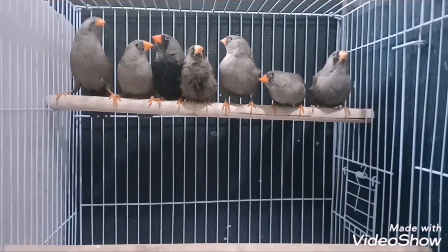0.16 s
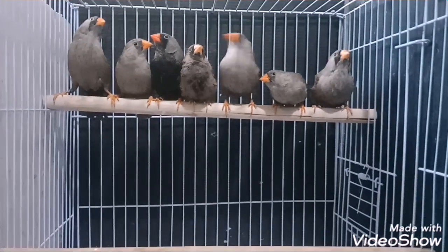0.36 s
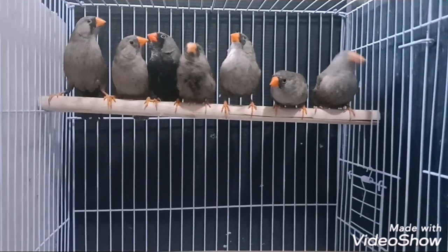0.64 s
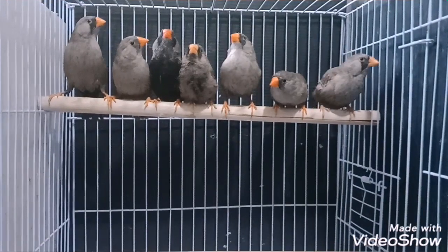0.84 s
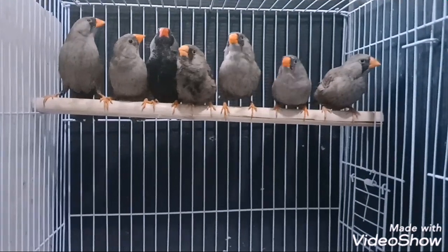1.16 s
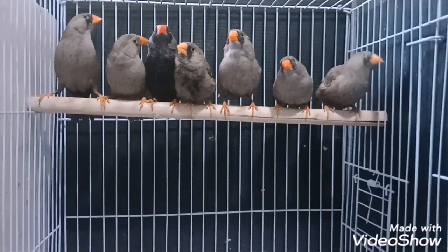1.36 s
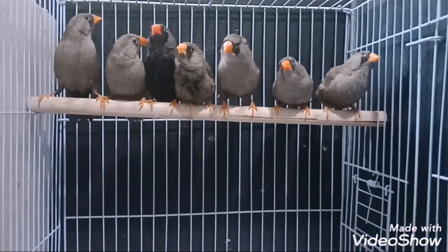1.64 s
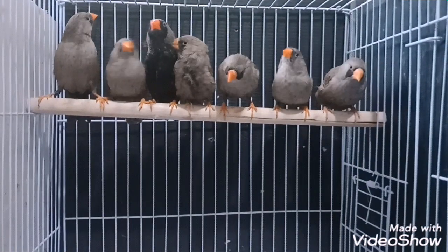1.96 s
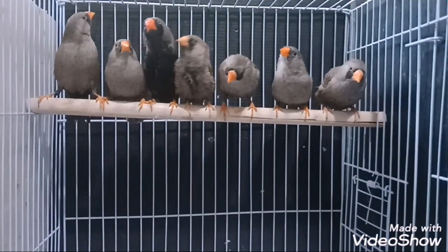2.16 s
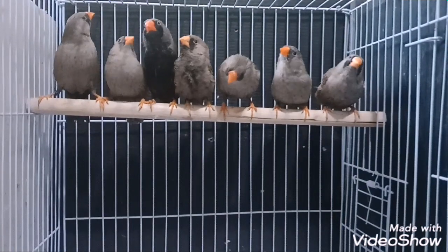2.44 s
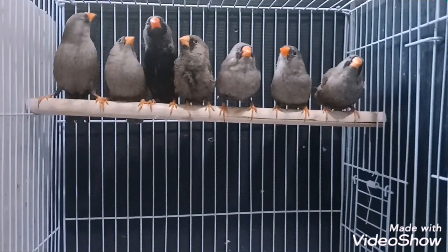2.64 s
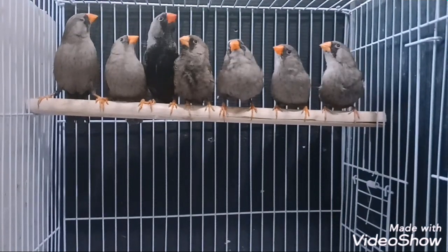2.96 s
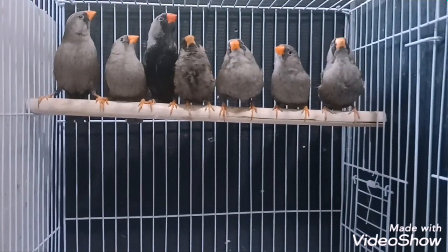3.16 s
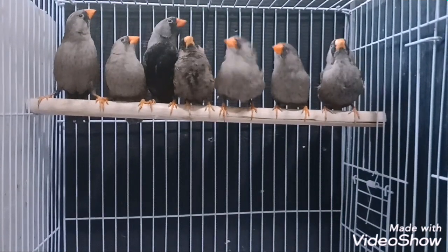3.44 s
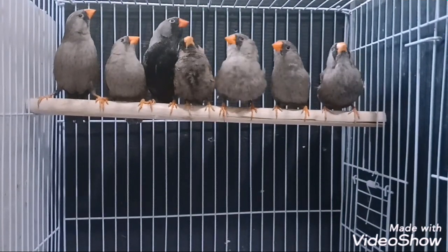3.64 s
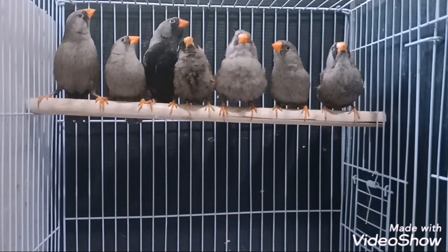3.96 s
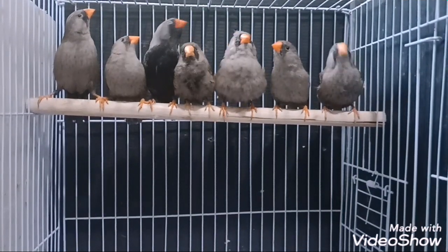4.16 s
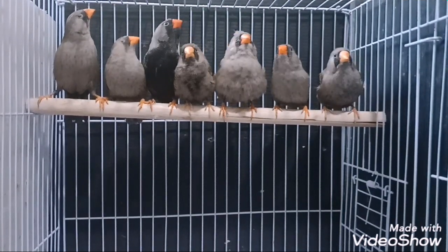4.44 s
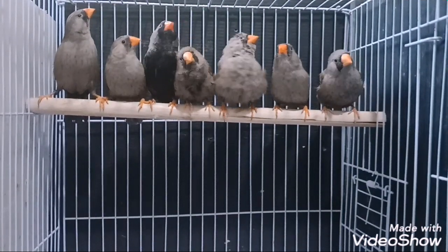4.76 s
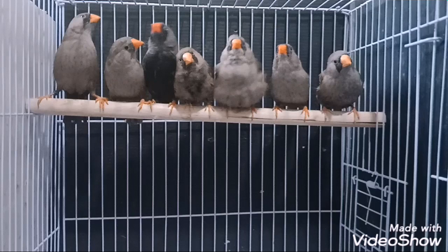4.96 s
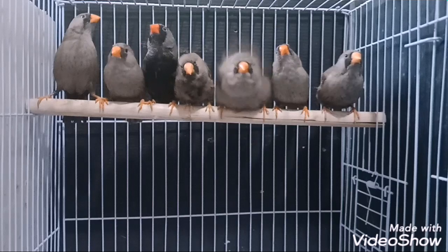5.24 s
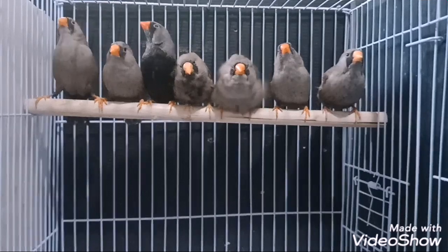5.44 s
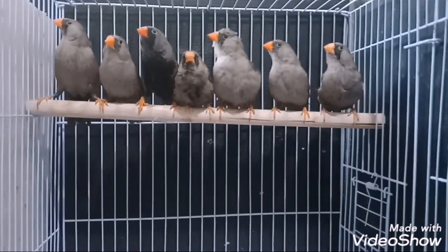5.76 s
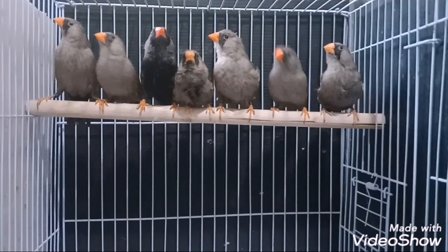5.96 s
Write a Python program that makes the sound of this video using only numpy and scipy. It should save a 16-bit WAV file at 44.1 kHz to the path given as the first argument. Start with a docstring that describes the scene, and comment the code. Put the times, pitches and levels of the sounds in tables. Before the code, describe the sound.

Small caged finches chatter nonstop indoors, hoarse nasal beeps and short fluttering whistles overlapping a farther flock, with a few hollow knocks.

```python
"""Small finches in a hard-walled room, over the murmur of a farther flock and a low rumble that comes and goes.
Hoarse calls close by open it (ragged harmonic stacks with hiss); short whistles (fluttering tones) soon join.
One clear arched call stands out, with a few short clear calls near it and two more near the end.
Something hollow is knocked twice midway and twice near the end: ringing partials over a dull thud.
A two-port microphone takes it all in; its left port is shaded and hears birds and knocks a little later."""
import sys
import numpy as np
from scipy import signal
from scipy.fft import rfft, irfft, next_fast_len
from scipy.io import wavfile
from scipy.ndimage import uniform_filter1d, minimum_filter1d, map_coordinates

SR = 44100
rng = np.random.default_rng(int(sys.argv[2]) if len(sys.argv) > 2 else 0)


def pcm_store(signal):
    """Save signal as 16-bit PCM."""
    levels = np.round(np.clip(np.atleast_2d(signal), -1, 1) * 32767)
    wavfile.write(sys.argv[1], SR, levels.astype(np.int16).T)


def magnitude_from_level(level_db):
    """Linear magnitude for a level in decibels (20 dB per decade)."""
    exponent = np.asarray(level_db, float) / 20
    return 10 ** exponent


N = 269010

# throat of the arched call and of the flock: hz, gain_db
ARCH_AND_FLOCK_THROAT = [(400, -51.5), (1000, -11), (1700, -11.5), (2500, -3.5), (3500, 0.5), (4500, -8.5),
                         (5500, -16), (7000, -31.5), (8500, -95.5)]


def unit(x):
    """Scale to rms 1."""
    return x / np.sqrt(np.mean(x ** 2) + 1e-20)


def along(points, hz):
    """Read (hz, value) points on a logarithmic frequency axis."""
    f, v = np.transpose(points)
    return np.interp(np.log(hz + 1), np.log(f + 1), v)


def curves(rows):
    """One value per sample for each column after the time."""
    s, *cols = np.transpose(rows)
    return [np.interp(np.arange(N) / SR, s, c) for c in cols]


def wobble(n, rate):
    """A smooth random curve, rate knots a second."""
    knots = rng.standard_normal(int(n * rate / SR) + 4)
    return map_coordinates(knots, [np.arange(n) * rate / SR])


def filtered(x, response):
    """Multiply the spectrum of x by a response of frequency in Hz."""
    m = next_fast_len(N + 8192)
    return irfft(rfft(x, m) * response(np.fft.rfftfreq(m, 1 / SR)), m)[..., :N]


def add(out, s, sound, pan_db):
    """Place a sound at s seconds; pan_db is left over right, and the port it favours hears it earlier."""
    lag_per_db = 2.5  # samples between the ports
    for port, sign in zip(out, (1, -1)):
        start = max(round(s * SR - sign * lag_per_db * pan_db / 2), 0)
        part = port[start:][:len(sound)]
        part += magnitude_from_level(sign * pan_db / 2) * sound[:len(part)]


def swell(n, rise):
    """Breath of one call: a rise and fall; the smaller rise, the earlier the peak."""
    return np.sin(np.pi * np.linspace(0, 1, n) ** rise)


def surges(rows, rise_db_per_s, fall_db_per_s, rest_db):
    """Amplitude of swells that climb, hold and sink at steady dB rates above a resting level."""
    t = np.arange(N) / SR
    power = magnitude_from_level(rest_db) ** 2
    for s, held, db, *_ in rows:
        below_db = np.maximum(0, np.maximum(rise_db_per_s * (s - t), fall_db_per_s * (t - s - held)))
        power = power + magnitude_from_level(db - below_db) ** 2
    return np.sqrt(power)


def voice(pitch_hz, throat, jitter, shimmer_db, breathy=0):
    """The syrinx: harmonics of unsteady cycles, each waxing and waning alone, smeared by turbulent breath."""
    n, k = len(pitch_hz), np.arange(1, 15)[:, None]
    phase = 2 * np.pi * np.cumsum(pitch_hz * (1 + jitter * wobble(n, 505.7))) / SR
    waver = magnitude_from_level(shimmer_db * wobble(n * len(k), 89.9).reshape(len(k), n))
    breath = wobble(n * len(k), 800).reshape(len(k), n)
    waver = waver * (1 - breathy + breathy * breath)
    stack = waver * throat(k * pitch_hz) * np.sin(k * phase + rng.uniform(0, 2 * np.pi, k.shape))
    return unit(stack.sum(0) * magnitude_from_level(shimmer_db / 2 * wobble(n, 302.6)))


def rasps():
    """Hoarse calls close by: ragged cycles on a rising and sagging pitch, and a hiss on top."""
    # the calls: start_s, length_s (before the breath stretches it), level_db, hiss_over_call_db (before its filter)
    calls = [(0.008, 0.13, -19, -11), (0.221, 0.07, -22, -11.5), (0.437, 0.11, -20, -6.5),
             (0.759, 0.036, -18.5, -42), (1.341, 0.05, -27, -16), (1.448, 0.072, -20.5, -24),
             (1.588, 0.069, -22.5, -14), (1.97, 0.12, -25, -15.5), (2.098, 0.079, -17.5, -15),
             (2.197, 0.07, -24, -19), (2.416, 0.096, -25.5, -30), (2.556, 0.079, -18, -25),
             (2.676, 0.077, -19, -22), (2.844, 0.11, -17, -20.5), (3.285, 0.03, -29, -35),
             (3.383, 0.098, -18.5, -18.5), (4, 0.037, -25, -29), (4.224, 0.05, -27.5, -44),
             (4.273, 0.066, -22.5, -17), (4.317, 0.086, -18.5, -16), (4.466, 0.092, -20, -22.5),
             (4.75, 0.115, -15, -14.5), (5.306, 0.064, -18, -20.5), (5.493, 0.04, -24.5, -28),
             (5.643, 0.064, -25, -44), (5.714, 0.051, -18.5, -22)]
    # throat of a hoarse call: hz, gain_db
    hoarse_throat = [(400, -29.5), (1200, -35), (2000, -9), (3200, -6.5), (4500, -4.5), (5600, -1.5),
                     (6500, -10.5), (7400, -32.5), (9000, -31), (11000, -75.5)]
    # colour of the hiss: hz, gain_db
    hiss_colour = [(6500, -87), (8000, -4), (10000, -9), (11500, -18), (14500, 0.5), (15400, -82.5)]
    stretch, lead_s = 1.4, .005  # breath length over call length; it starts early
    out, air = np.zeros((2, N)), np.zeros((2, N))
    for (s, length, db, hiss_db), (high, side) in zip(calls, rng.random((len(calls), 2))):
        n = int(stretch * length * SR)
        pitch = (560 + 300 * high) * (1 + .14 * np.sin(np.linspace(.5, 3.8, n)))
        sink = np.linspace(.98, 1.14, n)  # the throat resonances are divided by this during the call
        throat = lambda f: magnitude_from_level(along(hoarse_throat, f * sink))
        call = voice(pitch, throat, jitter=.025, shimmer_db=2, breathy=.65)
        call = magnitude_from_level(db + 0.41 * wobble(n, 91.0)) * swell(n, rise=.62) * call
        add(out, s - lead_s, call, 8 * (side - .5))
        hiss = magnitude_from_level(db + hiss_db + 4 * wobble(n, 120)) * swell(n, rise=0.7) * rng.standard_normal(n)
        add(air, s - lead_s, hiss, 0)
    return out + filtered(air, lambda f: magnitude_from_level(along(hiss_colour, f)))


def notes():
    """Whistles: the throat passes one harmonic, fluttering; long high peeps add the syrinx's second side."""
    # the whistles: start_s, length_s, pitch_hz (they glide and flutter about it), level_db
    whistles = [(0.507, 0.03, 3530, -14), (0.598, 0.17, 2945, -19.5), (0.65, 0.12, 3446, -23.5),
                (0.774, 0.051, 3420, -19), (1.185, 0.023, 3150, -24), (1.242, 0.065, 4230, -24),
                (1.24, 0.053, 2130, -28.5), (1.478, 0.036, 2980, -19.5), (1.714, 0.032, 2560, -21.5),
                (1.864, 0.027, 3680, -17), (1.894, 0.019, 3680, -17.5), (1.936, 0.047, 4060, -19),
                (1.948, 0.051, 4326, -14), (1.954, 0.093, 2630, -20.5), (1.969, 0.1, 4550, -14),
                (2.088, 0.018, 3235, -19.5), (2.131, 0.033, 2555, -17.5), (2.278, 0.022, 4300, -20),
                (2.319, 0.013, 4420, -13), (2.468, 0.11, 3250, -18.5), (2.848, 0.062, 4250, -17),
                (2.855, 0.073, 3115, -17.5), (2.408, 0.058, 2590, -20.5), (3.078, 0.11, 3446, -21.5),
                (3.109, 0.037, 4030, -14.5), (3.149, 0.058, 2760, -16), (3.3, 0.037, 3940, -24.5),
                (3.51, 0.087, 3500, -22), (3.554, 0.1, 2936, -20.5), (3.585, 0.11, 3486, -17.5),
                (3.646, 0.11, 2970, -14.5), (3.699, 0.098, 4310, -12), (3.769, 0.052, 3620, -22),
                (3.808, 0.18, 2743, -20), (4.031, 0.046, 3650, -18), (4.109, 0.022, 3620, -19),
                (4.168, 0.03, 2580, -15), (4.212, 0.042, 2690, -15.5), (4.324, 0.068, 3270, -11.5),
                (4.383, 0.04, 3560, -17.5), (4.395, 0.086, 2810, -20), (4.448, 0.012, 3490, -12),
                (4.517, 0.101, 3676, -16.5), (4.7, 0.033, 3205, -10), (4.723, 0.083, 2623, -16),
                (4.852, 0.047, 2775, -16.5), (4.994, 0.137, 3514, -19.5), (5.035, 0.11, 2886, -21),
                (5.197, 0.057, 3900, -26), (5.357, 0.088, 2420, -19), (5.727, 0.032, 3370, -11.5),
                (5.783, 0.093, 2650, -23), (5.845, 0.07, 3485, -15), (5.908, 0.037, 3590, -7),
                (5.924, 0.08, 3130, -13), (6.058, 0.03, 3570, -21)]
    glide, sag = .015, .05  # shares of the pitch: drift either way, and a fall that grows with pitch
    octave_db = -31
    out = np.zeros((2, N))
    for (s, length, hz, db), (slide, side) in zip(whistles, rng.uniform(-0.93, 1, (len(whistles), 2))):
        n = int(length * SR)
        unsteady = min(1, length / .07)  # long notes flutter most
        drift = glide * slide * np.linspace(-1, 1, n)
        fall = sag * (hz / 3500) ** 3 * (np.linspace(0, 1, n) ** 2 - .3)
        pitch = hz * (1 + drift - fall) * (1 + .022 * unsteady * wobble(n, 260))
        phase = 2 * np.pi * np.cumsum(pitch) / SR
        tone = np.sin(phase) + magnitude_from_level(octave_db) * np.sin(2 * phase)
        tone = tone * magnitude_from_level(3.5 * unsteady * wobble(n, 160))
        if hz > 4200 and length > .06:
            tone = tone + magnitude_from_level(4 * wobble(n, 160) - 7) * np.sin(1.08 * phase)
        add(out, s, magnitude_from_level(db) * swell(n, rise=0.5) ** 1.5 * tone, 4 * side - 1)
    return out


def clear_calls():
    """Calls with clean harmonic lines: steady cycles of the syrinx, one long arch and some short ones."""
    # course of the arched call: time_s, pitch_hz, level_db
    arch_course = [(.842, 660, -29.5), (0.858, 763, -13), (0.873, 837, -12.5), (0.892, 723.5, -13),
                   (.9, 688, -14), (0.909, 629, -13.5), (.93, 616, -18.5), (0.961, 585, -25)]
    # short calls: start_s, length_s, pitch_hz, level_db, throat_hz
    short_calls = [(.52, .06, 480, -33, 1900), (.73, .04, 860, -30, 2600), (.972, .05, 780, -21, 4250),
                   (5.36, .06, 600, -30, 2400), (5.5, .07, 515, -28, 2060)]
    out = np.zeros((2, N))
    start_s, end_s = arch_course[0][0], arch_course[-1][0]
    span = slice(int(start_s * SR), int(end_s * SR))
    pitch, db = [c[span] for c in curves(arch_course)]

    def arch_throat(f):
        return magnitude_from_level(along(ARCH_AND_FLOCK_THROAT, f)) / (1 + (f / 4600) ** 14) / (1 + (1900 / f) ** 4)

    arch = voice(uniform_filter1d(pitch, size=300), arch_throat, jitter=.003, shimmer_db=2)
    add(out, start_s, magnitude_from_level(db) * arch, 0.)
    for s, length, hz, db, throat_hz in short_calls:
        n = int(length * SR)

        def throat(f):
            resonance = 1 / (1 + ((f - throat_hz) / (.24 * throat_hz)) ** 4)
            return 0.2 * (f < throat_hz) * 2000 / throat_hz + resonance

        call = voice(hz * np.linspace(1.02, .96, n), throat, jitter=.014, shimmer_db=3.5)
        add(out, s, magnitude_from_level(db) * swell(n, rise=1.0) * call, -1.5)
    return out


def flock(count=150):
    """Farther birds: many short, bending calls from all sides overlap, blur in the room and surge together."""
    # outbursts: peak_s, held_s, level_db, throat_hz
    outbursts = [(0.098, 0.0062, -16, 3780), (0.47, 0.013, -15.5, 3030), (.65, 0.021, -31, 2740),
                 (0.79, 0.014, -15, 3530), (0.979, 0.0059, -28.5, 3300), (1.169, 0.02, -34.5, 2820),
                 (1.478, 0.0087, -29, 2930), (1.741, 0.0091, -27.5, 2920), (1.951, 0.015, -16.5, 3450),
                 (2.112, 0.0092, -16, 3040), (2.24, 0.073, -22.5, 3230), (2.399, 0.05, -22.5, 2700),
                 (2.569, 0.036, -19, 3020), (2.748, 0.12, -21, 2950), (2.882, 0.14, -18, 2950),
                 (3.149, 0.052, -17, 2670), (3.419, 0.088, -20.5, 2950), (3.572, 0.11, -17, 2790),
                 (3.779, 0.39, -30, 2600), (4.036, 0.17, -18, 3100), (4.34, 0.12, -16.5, 3300),
                 (4.511, 0.077, -16.5, 3440), (4.696, 0.14, -19, 3230), (5.036, 0.067, -19, 2760),
                 (5.37, 0.031, -22, 3210), (5.518, 0.14, -22, 2600), (5.761, 0.17, -17, 3040),
                 (6.09, 0.016, -22, 3460)]
    peaks, held, _, centres = np.transpose(outbursts)
    out = np.zeros((2, N))
    for i, (late, long, high, wide, side, bend, rough) in enumerate(rng.random((count, 7))):
        s, n = (i + late) * N / SR / count, int((0.03317 + 0.07 * long) * SR)
        pitch = (520 + 350 * high) * (1 + (.03 + .15 * bend) * np.sin(np.linspace(.6, 4.2, n)))
        # the resonance scatters about a course drawn from outburst to outburst
        throat_hz = np.interp(s, peaks + held / 2, centres) + 900 * (wide - .5)

        def throat(f):
            resonance = 1 / (1 + ((f - throat_hz) / 450) ** 2)
            return magnitude_from_level(along(ARCH_AND_FLOCK_THROAT, f)) * (.17 + .25 * (f > 4500) + resonance)

        call = voice(pitch, throat, jitter=.006 + .03 * rough, shimmer_db=4, breathy=.4 * rough)
        add(out, s - .03, swell(n, rise=0.61) * call, 12 * (side - .5))
    out = out + .55 * room(out)
    # even out the chatter before the surges shape it
    even = out / np.sqrt(uniform_filter1d(np.mean(out ** 2, 0), size=2500) + 0.011)
    return even * surges(outbursts, rise_db_per_s=174.5, fall_db_per_s=180.5, rest_db=-36)


def knocks():
    """Every blow rings the partials of the hollow thing unevenly, over a dull broad thud."""
    # the blows: start_s, level_db
    blows = [(2.638, -26.5), (2.752, -31), (5.648, -22.5), (5.764, -25)]
    # partials of the hollow thing: hz, level_db, t60_s
    partials = [(390, -15, .2), (630, -9, .15), (727, -5, .2), (773, -2, .25), (1003, -7, .2),
                (1250, -10, .12)]
    out, t = np.zeros((2, N)), np.arange(SR // 2) / SR
    for s, db in blows:
        ring = np.zeros(len(t))
        for hz, level, t60 in partials:
            ring += magnitude_from_level(level + 4 * wobble(len(t), 35) - 60 * t / t60) * np.sin(2 * np.pi * hz * t)
        dull = uniform_filter1d(uniform_filter1d(rng.standard_normal(len(t)), size=7), size=5)
        thud = 2.6 * magnitude_from_level(-60 * t / .4) * dull
        thud = thud - uniform_filter1d(thud, size=60)  # takes the lowest part away
        add(out, s, magnitude_from_level(db) * (ring + thud) * (1 - np.exp(-t / 0.01)), 2.5)
    return out


def room(x, count=20):
    """Hard walls: noise tails die at a speed set by frequency, differ by port and change piece by piece."""
    # decay of the walls' answer: hz, t60_s
    decay = [(200, 0.087), (2000, 0.22), (5000, 0.43), (10000, 0.0044)]
    out, hop = np.zeros((2, N + SR)), N // (count - 1) + 1
    mono = np.pad(x.mean(0), (hop, 2 * hop))
    for i in range(count):
        hz, t, z = signal.stft(rng.standard_normal((2, SR // 2)), SR, nperseg=256)
        tail = signal.istft(z * magnitude_from_level(-60 * t / along(decay, hz)[:, None]), SR, nperseg=256)[1]
        piece = mono[i * hop:(i + 2) * hop] * np.hanning(2 * hop)  # overlapping pieces crossfade
        wet = signal.fftconvolve(piece[None], tail / np.linalg.norm(tail[0]), axes=1)
        wet = wet[:, max(0, (1 - i) * hop):]
        part = out[:, max(0, (i - 1) * hop) + 250:][:, :wet.shape[1]]  # 250 samples after the direct sound
        part += wet[:, :part.shape[1]]
    return out[:, :N]


def rumble():
    """A low rumble comes through the walls nearly alike at both ports: noise shaped by the room modes."""
    # swells: peak_s, held_s, level_db, extra_db (below the split)
    swells = [(.25, 0.3, -41.5, -5), (.6, 0.34, -38.5, -4.5), (1.251, 0.33, -49, 7), (2.22, 0.21, -47, 3),
              (4.1, 0.31, -55.5, 4), (4.85, 0.32, -48.5, -16), (5.7, 0.14, -41, -4.5)]
    # room modes: hz, gain_db
    modes = [(25, -42), (42, -38.5), (55, -7), (66, -11.5), (82, 0), (105, -15.5), (130, -1), (170, -8),
             (260, -14.5), (400, -90.5)]
    rise_db_per_s, fall_db_per_s, rest_db, split_hz = 65.5, 61.5, -57.5, 100
    upper = surges(swells, rise_db_per_s, fall_db_per_s, rest_db)
    deep_swells = [(s, held, db + extra_db) for s, held, db, extra_db in swells]
    deep = surges(deep_swells, rise_db_per_s, fall_db_per_s, rest_db)
    noise = rng.standard_normal(N) + 0.17 * rng.standard_normal((2, N))
    drone = unit(filtered(noise, lambda f: magnitude_from_level(along(modes, f))))
    low = filtered(drone, lambda f: 1 / (1 + (f / split_hz) ** 8))
    waver = magnitude_from_level(2.2 * wobble(N, 7.9))
    return waver * (deep * low + upper * (drone - low))


def room_noise():
    """Room noise, patchy in time and frequency; the ports differ more the higher it is."""
    # course of the noise: time_s, level_db
    course = [(0, -33), (1.4, -32), (1.9, -36), (3.4, -33), (3.76, -44), (4.1, -37), (4.7, -35),
              (5.05, -31.5), (5.45, -34.5), (5.74, -33), (6.1, -34)]
    # colour of the noise: hz, gain_db
    colour = [(120, -23.5), (220, -11), (330, -20.5), (480, -16.5), (600, -21.5), (850, -15.5), (1500, -16),
              (2200, -6), (5000, -32), (7800, -43), (8800, -100)]
    hush_db, = curves(course)
    own = filtered(rng.standard_normal((2, N)), lambda f: f / (f + 300))
    z = signal.stft(rng.standard_normal(N) + 2.04 * own, nperseg=512)[2]
    patches = uniform_filter1d(rng.standard_normal(z.shape[1:]), size=5, axis=0)
    patches = unit(uniform_filter1d(patches, size=14, axis=1))
    patchy = signal.istft(z * magnitude_from_level(3.5 * patches), nperseg=512)[1][:, :N]
    return magnitude_from_level(hush_db) * unit(filtered(patchy, lambda f: magnitude_from_level(along(colour, f))))


def scene():
    """Near birds and knocks in the room, over the flock; the left port hears them all later."""
    lag_s = 0.0003858
    near = rasps() + notes() + clear_calls() + knocks()
    left, right = near + magnitude_from_level(-7) * room(near) + flock()
    late_left = filtered(left, lambda f: np.exp(-2j * np.pi * f * lag_s))
    return np.array([late_left, right]) + rumble() + room_noise()


def top_cut(x):
    """Nothing passes above the cut-off."""
    return signal.sosfilt(signal.butter(12, 15440, fs=SR, output="sos"), x)


def record(dry):
    """The microphone: its left port is shaded and duller, and a limiter holds the loudest peaks down."""
    # the shaded left port: hz, gain_db
    shade = [(200, 1), (400, 3.5), (750, -2), (2500, 2), (4500, -1.5), (6000, -9), (8000, -26),
             (13000, -45)]
    both = np.array([filtered(dry[0], lambda f: magnitude_from_level(along(shade, f))), dry[1]])
    needed = np.minimum(1, .95 / (np.abs(both).max(0) + 1e-9))
    both = both * uniform_filter1d(minimum_filter1d(needed, size=265), size=131)
    return top_cut(both)


dry = scene()
out = record(dry)
pcm_store(out)
```